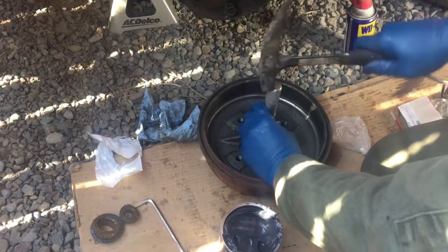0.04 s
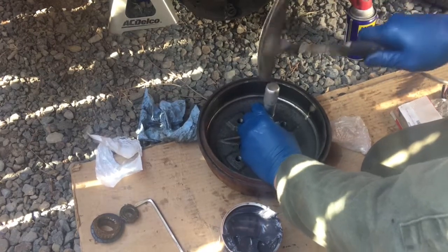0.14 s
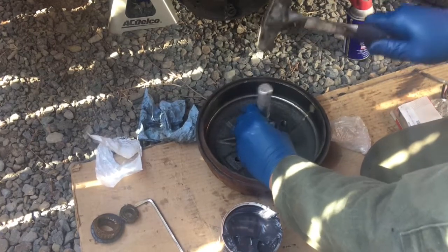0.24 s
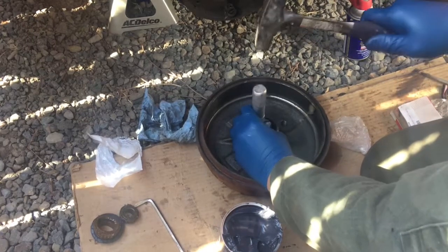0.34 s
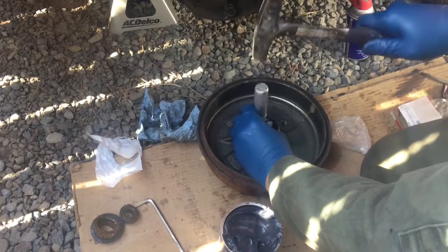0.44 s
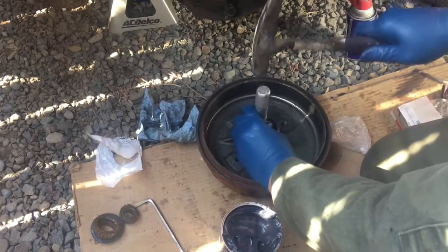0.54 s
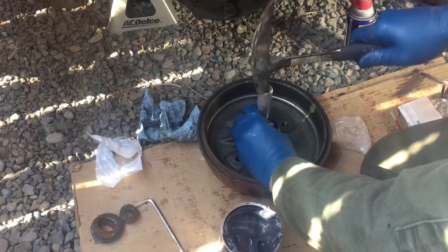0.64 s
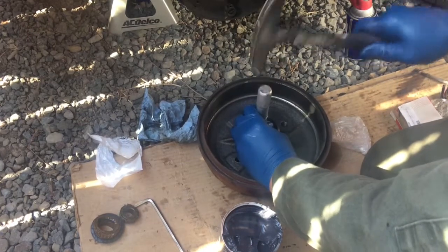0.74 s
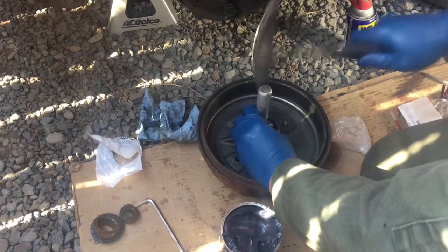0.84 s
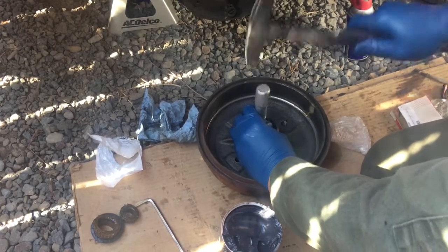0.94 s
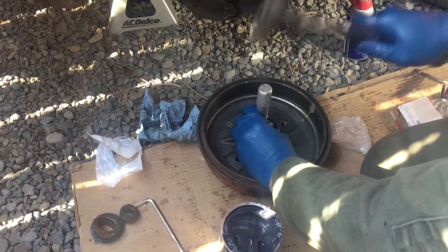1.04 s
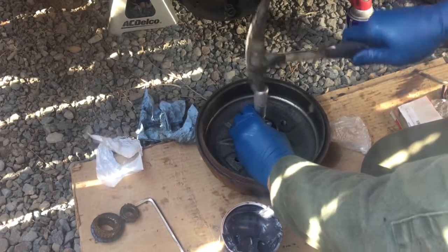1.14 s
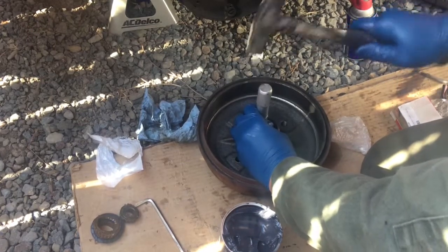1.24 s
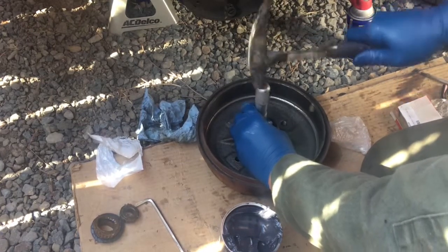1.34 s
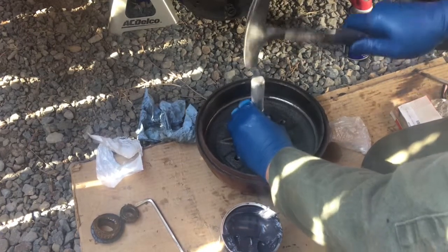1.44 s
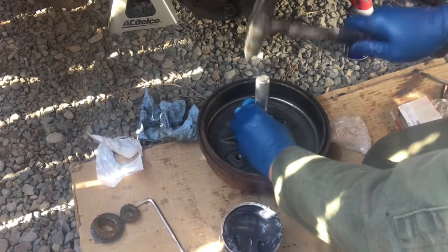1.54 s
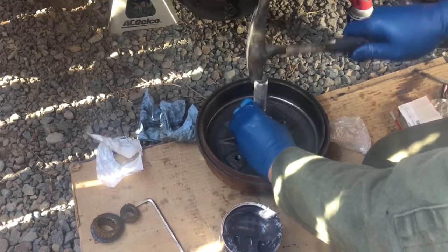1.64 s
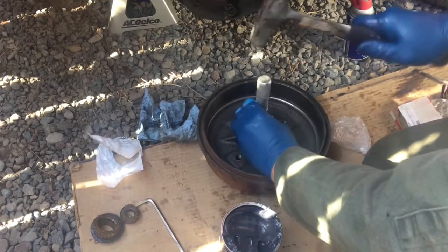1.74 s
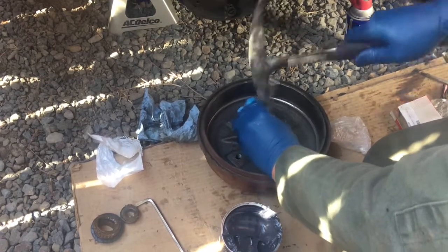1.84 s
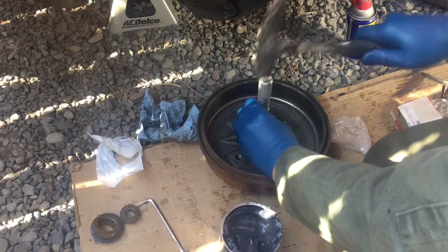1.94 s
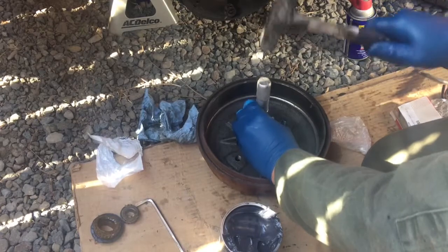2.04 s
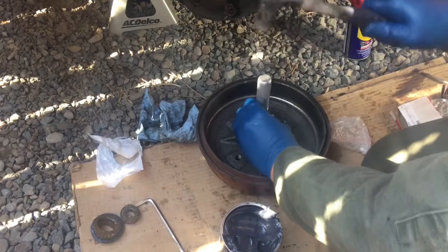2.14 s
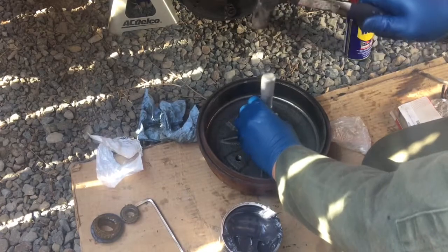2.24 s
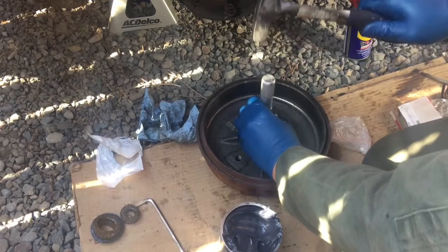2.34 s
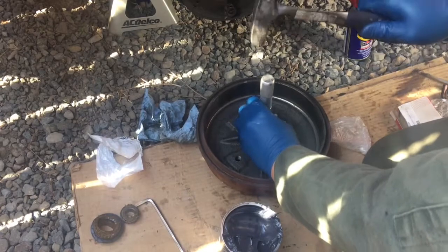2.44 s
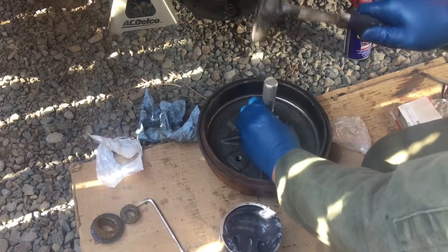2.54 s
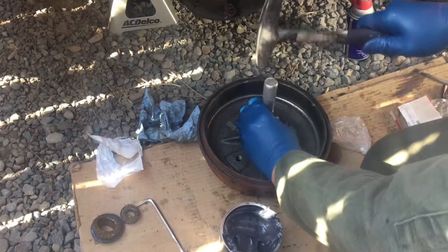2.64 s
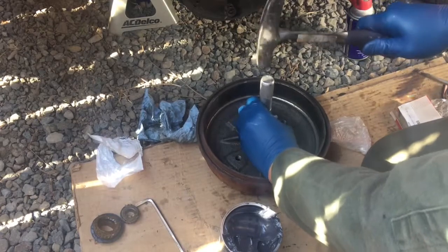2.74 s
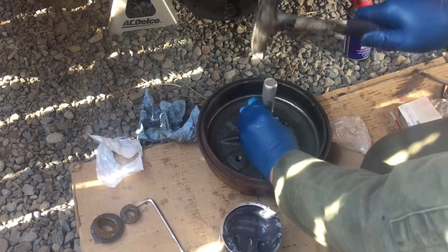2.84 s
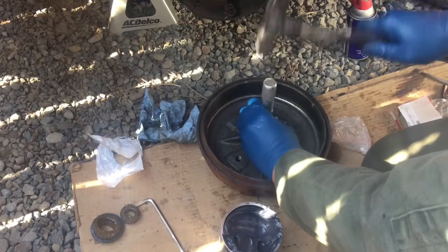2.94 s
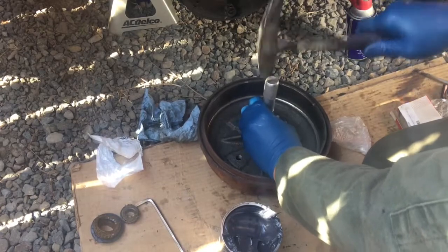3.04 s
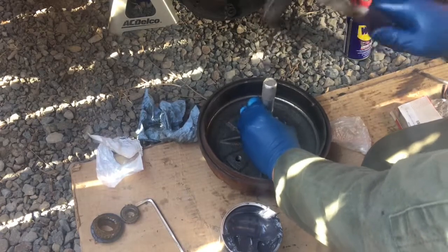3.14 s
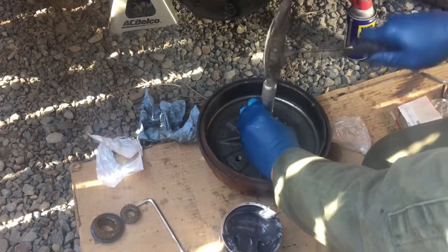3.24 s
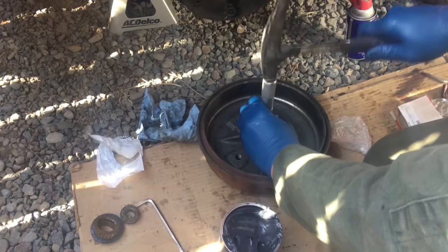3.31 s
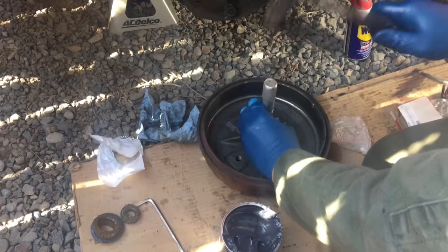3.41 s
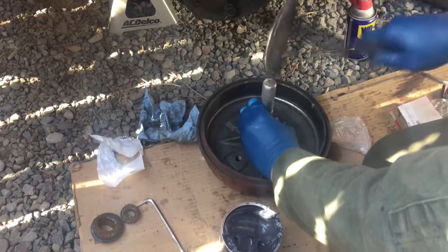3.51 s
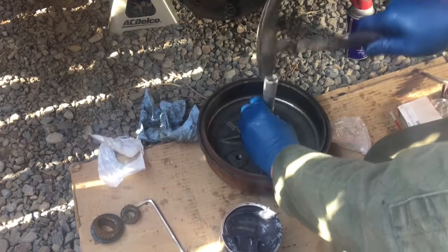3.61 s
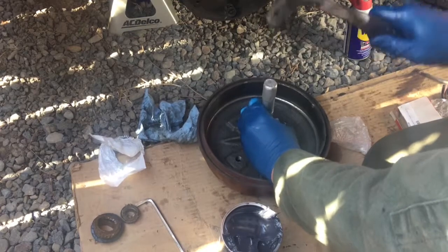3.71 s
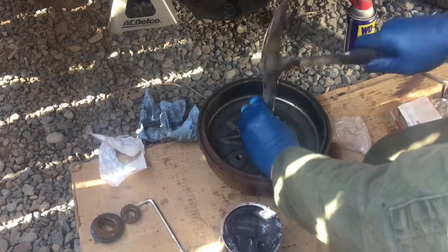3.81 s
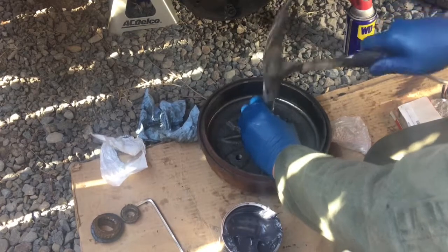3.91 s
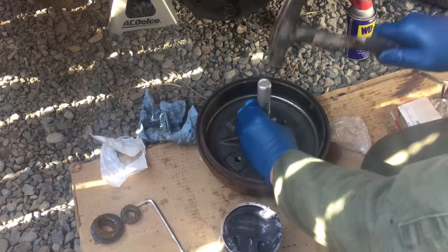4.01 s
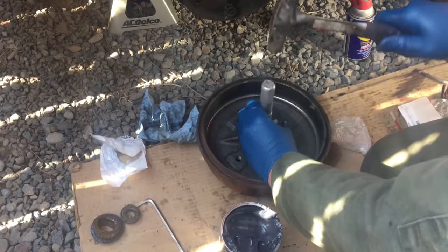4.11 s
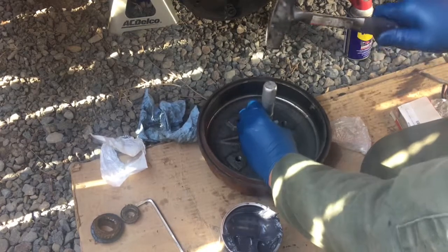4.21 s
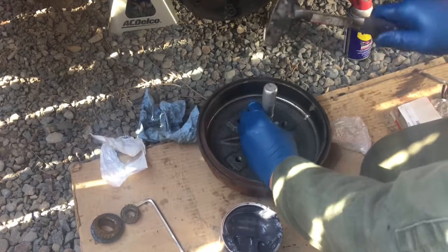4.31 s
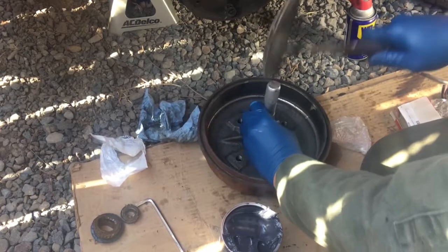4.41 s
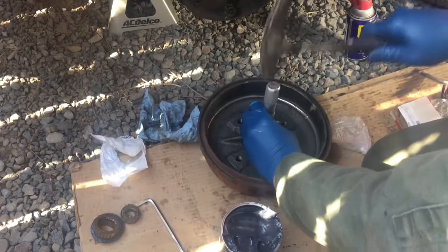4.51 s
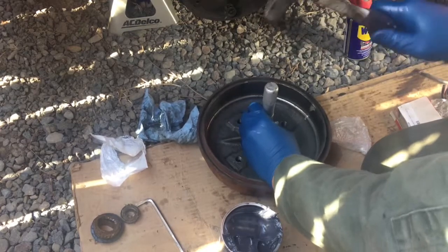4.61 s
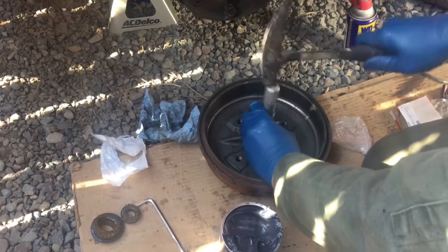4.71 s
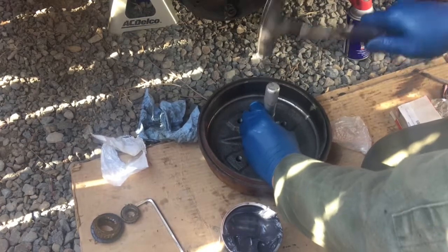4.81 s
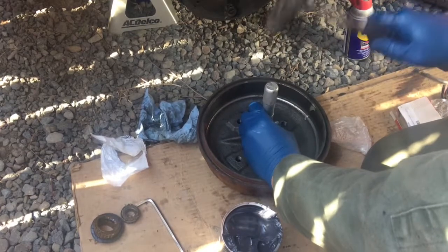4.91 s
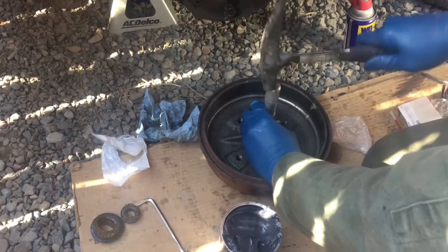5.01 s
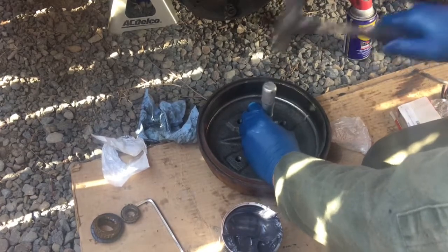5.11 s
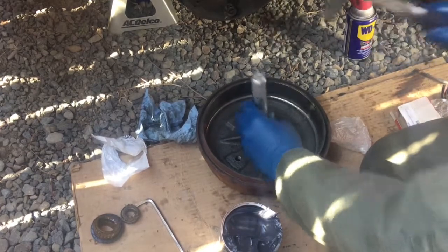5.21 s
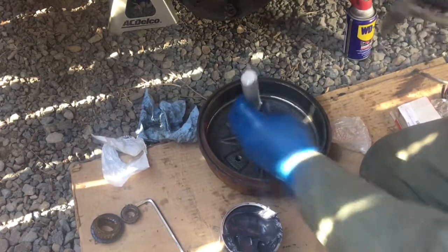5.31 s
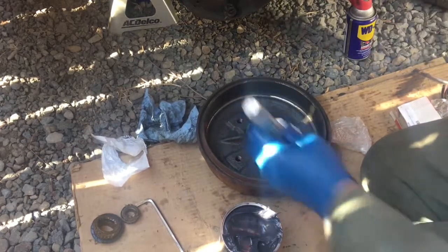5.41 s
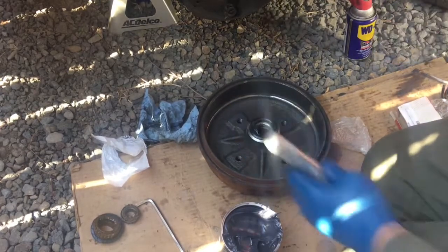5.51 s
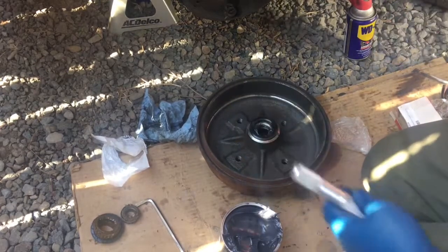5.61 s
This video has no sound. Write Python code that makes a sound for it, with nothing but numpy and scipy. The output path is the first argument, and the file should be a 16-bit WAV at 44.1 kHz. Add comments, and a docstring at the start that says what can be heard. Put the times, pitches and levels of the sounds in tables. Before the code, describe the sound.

Loud, close metal hammering outdoors: a single strike, then runs of five, four and three blows on a steel punch held against a brake drum. Each hit clanks, pings and distorts a little, leaving a soft ringing tone. A light clink and faint far-off bird chirps follow the first run. It finishes with a soft rustle of cloth and a dull knock over a faint low rumble.

```python
"""Hammering a seal in a brake drum

Outdoors, one microphone close in. A hammer drives a steel drift against the hub seal in three short
runs: each blow clanks the drum, pings the tools and overloads the microphone, and the rim hums on.
A far bird chirps in a pause; at the end a sleeve rustles as the drift is lifted, and something bumps."""
import sys
import numpy as np
from scipy import signal
from scipy.fft import rfft, irfft
from scipy.io import wavfile
from scipy.ndimage import uniform_filter1d

SR = 44100
rng = np.random.default_rng(int(sys.argv[2]) if len(sys.argv) > 2 else 0)


def wav_record(signal):
    """Record a signal, one row per channel, as 16-bit PCM in the file named by sys.argv[1]."""
    frames = np.transpose(np.atleast_2d(signal))
    bounded = np.clip(frames, -1, 1)
    # unit amplitude maps onto the largest positive 16-bit level
    quanta = np.round(bounded * 32767).astype(np.int16)
    wavfile.write(sys.argv[1], SR, quanta)


N = 249341
T, CLOCK = np.arange(SR) / SR, np.arange(N) / SR  # one second; the whole scene
HZ, ALL_HZ = np.fft.rfftfreq(SR, 1 / SR), np.fft.rfftfreq(2 * N, 1 / SR)
CONTACT_S, USUAL_CLATTER_S = .0003, .0125  # rise of a steel contact; clatter length of neutral tone

# hammer blows: t/s, force/dB, clatter length/s, spot on the seal (0-1), squareness of seating/dB,
# free ringing of the tools/dB, f/Hz favoured by the drift's tilt, its lift/dB
BLOWS = [ (-0.011, -1.5, .013, 0.7, 10, -6, 3045, 1.5), (0.8454, -3, 0.01, 0.05, -0.5, -18, 2370, 7),
         (1.0792, -3, 0.01, 0.06, 6.5, -19.5, 3080, 10.5), (1.3332, -5, .011, 0.3, -6, -19, 2230, 8),
         (1.5856, -9, .012, .05, -3, -17.5, 471, 11.5), (1.8082, -3.5, 0.0093, .25, -2.5, -15, 3760, 2.5),
         (2.9730, -3.5, 0.0084, 0.72, -7.5, -20, 1650, 4), (3.24, -3, .014, 0.87, 2, -4.5, 4220, 8.5),
         (3.5108, -6, .02, 1, 1, 5.5, 4060, 7), (3.7758, -3.5, 0.014, 1, -1, -3, 1730, 2.5),
         (4.429, -4.5, 0.0098, 0.76, -7, -13, 3840, 9.5), (4.6905, -4.5, 0.013, 0.54, 6.5, 3, 3990, -0.5),
         (4.9555, -8, 0.021, 1, 8, 3.5, 3910, -0.5)]
# chatter of drift, seal and hub: f/Hz, level/dB
CLATTER_SPECTRUM = [(40, -28), (90, -13.5), (200, -10.5), (370, -4.5), (560, -2), (900, -9), (1450, -13.5),
                    (1680, 8.5), (1900, -4), (2400, -1), (3000, -6.5), (7500, -3), (10000, -13.5),
                    (15500, -11.5)]
# modes of hub and drum, quickly damped by the ground: f/Hz, level/dB at spot 0, level/dB at spot 1
DRUM_MODES = [(247, -27, -30.5), (345, -20, -25), (385, -26.5, -7.5), (488, -10, -25.5), (572, -10, -16),
              (768, -26.5, -18.5), (1095, -34.5, -31.5), (1700, -19.5, -14.5), (1701, -14.5, -2.5),
              (1957, -27.5, -18), (2096, -16, -18), (2183, -9, -18), (2324, -12.5, -25.5), (2410, -18, -17),
              (2470, -21, -16), (3160, -15, -26.5), (3440, -28, -25.5), (3770, -21.5, -26),
              (3704, -19.5, -11.5), (4120, -25.5, -18), (4820, -26, -30)]
# modes of hammer head and drift: f/Hz; and for each: t60/s, level/dB, dB gained per dB of free ringing
TOOL_HZ = [4801, 5437, 5879, 6114, 7959, 13278]
TOOL_MODES = [(.11, -1, 1.05), (.17, -5, 1.1), (0.17, -13, 0.54), (0.13, -4, 1.2), (.072, 2.5, .45),
              (.058, 3.5, 1.4)]
# scatter off gravel and nearby walls, then the echo from further off: f/Hz, level/dB
NEAR_SPECTRUM = [(100, 3), (250, 2.5), (450, -7), (800, 0), (1100, 3), (1650, -2.5), (2200, -0.5),
                 (4000, 2), (7500, -2), (10000, 3), (15000, -2)]
FAR_SPECTRUM = [(100, -6), (450, 0.5), (1150, 3), (1700, 5.5), (2300, -1), (3200, 0.5), (4500, -4),
                (6000, -10.5), (12000, -19)]
# their decay: f/Hz, t60/s
NEAR_T60 = [(100, 0.23), (500, 0.3), (2000, 0.23), (5000, 0.18), (9000, 0.165), (15000, .16)]
FAR_T60 = [(100, 1), (1700, 1), (3200, 1), (5500, 1), (12000, .25)]
# free rim, a beating low pair and a higher tone: f/Hz; for each: t60/s, level/dB at spot 0 and at spot 1
RIM_HZ = [655, 678, 1535]
RIM_MODES = [(2.6, -48, -50.5), (3.9, -47.5, -61), (1.5, -45, -46)]
# outdoor hiss and rumble: f/Hz, level/dB
AIR_SPECTRUM = [(20, -29.5), (130, -18.5), (300, -26), (700, -32.5), (1500, -35), (3000, -41),
                (5000, -42.5), (9000, -46), (15500, -46)]
RUMBLE_SPECTRUM = [(20, -34), (32, -16), (45, -5), (62, 3.5), (90, -4), (130, -15), (250, -32.5),
                   (600, -54), (1500, -88.5)]
# slow swell of the rumble: t/s, level/dB
RUMBLE_SWELL = [(0, -52.5), (0.7, -57.5), (2.8, -57), (5, -52)]
# rebounds and light touches of the tools: t/s, level/dB, half-spread of the spectrum/octaves
TOUCHES = [(0.010, -16.5, 1.2), (0.623, -54, .62), (0.682, -52.5, 0.57), (2.2026, -25.5, 0.84),
           (3.535, -19.5, 1.4), (4.1035, -41, 2.1), (4.323, -64, 0.59), (4.984, -13, 0.84),
           (5.152, -52, 0.69), (5.534, -44, .68)]
# clink of the drift set down: f/Hz, t60/s, level/dB
CLINK_MODES = [(565, 0.103, -37.5), (1656, .055, -29), (2410, 0.053, -30.5), (3550, .045, -29.5),
               (3870, .045, -27), (6160, 0.047, -25.5), (7790, 0.044, -27)]
# far bird: t/s, length/s, start f/Hz, end f/Hz, level/dB
CHIRPS = [(2.528, 0.048, 4176, 3710, -69.5), (2.553, 0.07, 3586, 3700, -69.5),
          (2.68, 0.039, 3460, 3000, -57), (2.79, 0.041, 3390, 2320, -63)]
# rubbing cloth: f/Hz, level/dB
CLOTH_SPECTRUM = [(100, 5), (900, 3.5), (2000, 4.5), (3500, -0.5), (7000, -4.5), (11000, -11), (15500, -7)]
# something dull, bumped: f/Hz, t60/s, level/dB
BUMP_MODES = [(136, 0.075, -23.5), (304, 0.1, -27), (405, 0.099, -29), (580, 0.041, -34.5)]
# treble droop of the recorder: f/Hz, level/dB
RECORDER_RESPONSE = [(20, 0.5), (9000, -1), (12500, -3), (14500, -4), (16000, -5.5)]


def amp(db):
    """Decibels to gain."""
    return 10 ** (np.asarray(db) / 20)


def curve(points, hz):
    """Points joined by straight lines on a log-frequency axis."""
    f, value = np.transpose(points)
    return np.interp(np.log(hz + 1), np.log(f + 1), value)


def bell(hz, centre_hz, octaves):
    """A bell of height 1 on a log-frequency axis."""
    return np.exp(-.5 * (np.log2((hz + 1) / centre_hz) / octaves) ** 2)


def rise(seconds):
    """An onset that settles at 1."""
    return 1 - np.exp(-T / seconds)


def fade(t, t60):
    """Exponential decay, 60 dB down after t60."""
    return np.exp(-np.log(1000) * t / t60)


def add(mix, s, sound):
    """Mixes a sound in at time s, which may lie before zero."""
    at = round(s * SR)
    sound = sound[max(-at, 0):]
    part = mix[max(at, 0):][:len(sound)]
    part += sound[:len(part)]


def noise(shape_db):
    """Noise of rms 1 with the given spectral shape."""
    x = irfft(amp(shape_db) * np.exp(2j * np.pi * rng.random(len(shape_db))))
    return x / x.std()


def ring(modes, t=T):
    """Dying sines, one for each row of f/Hz, t60/s, level/dB."""
    return sum(amp(db) * fade(t, t60) * np.sin(2 * np.pi * (hz * t + rng.random()))
               for hz, t60, db in modes)


def clatter(length_s, colour_db, bounce_db=3, bounce_hz=220):
    """The drift chatters on the seal in uneven bounces and stops short, shaking a crowd of modes."""
    bounces = amp(bounce_db * noise(-10 * np.log10(1 + (HZ / bounce_hz) ** 6)))
    chatter = noise(curve(CLATTER_SPECTRUM, HZ) + colour_db)
    return amp(4) * chatter * bounces * np.exp(-(T / length_s) ** 1.8)


def drum(spot, colour_db, t60=.1):
    """Hub and drum ring briefly, in a mix of modes set by the spot struck."""
    modes = [(hz, t60, (1 - spot) * db0 + spot * db1 + np.interp(hz, HZ, colour_db))
             for hz, db0, db1 in DRUM_MODES]
    return amp(-1) * ring(modes) * rise(.00028)


def tool_pings(free_db):
    """The steel of hammer head and drift pings, louder when free to ring."""
    modes = [(hz, t60, db + gain * free_db) for hz, (t60, db, gain) in zip(TOOL_HZ, TOOL_MODES)]
    return amp(-1) * ring(modes) * rise(CONTACT_S)


def echo(spectrum, t60s):
    """A diffuse tail of energy 1, each band dying at its own speed."""
    hz, t, bands = signal.stft(noise(curve(spectrum, HZ)), SR, nperseg=256)
    tail = signal.istft(bands * fade(t, curve(t60s, hz)[:, None]), SR, nperseg=256)[1][:SR]
    return tail / np.linalg.norm(tail)


def surroundings(sound):
    """Gravel and nearby walls scatter a sound back; a duller, longer echo follows from further off."""
    paths = amp(-12) * echo(NEAR_SPECTRUM, NEAR_T60) + amp(-40) * echo(FAR_SPECTRUM, FAR_T60)
    return signal.fftconvolve(sound, paths * rise(.0037))[:SR]


def hammer():
    """Blows close to the microphone: a square seating knocks and thuds more, a long contact is duller."""
    out = np.zeros(N)
    for s, force_db, length_s, spot, seat_db, free_db, accent_hz, accent_db in BLOWS:
        knock = .85 * seat_db * bell(HZ, 900, octaves=.37)
        thud = .77 * seat_db * bell(HZ, 100, octaves=1)
        accent = accent_db * bell(HZ, accent_hz, octaves=.089)
        db_per_octave = .72 * np.log2(USUAL_CLATTER_S / length_s)
        colour_db = knock + thud + accent + db_per_octave * np.log2((HZ + 100) / 3000)
        clank = (drum(spot, colour_db) + clatter(length_s, colour_db)) * rise(CONTACT_S)
        pings = tool_pings(free_db)
        echoes = surroundings(clank + amp(-4) * pings)  # the tools are nearer the microphone, so drier
        add(out, s, amp(force_db) * (clank + pings + echoes))
    return out


def rim_hum():
    """The drum's free rim hums on; a longer, squarer push swings its low pair more."""
    out = np.zeros(N)
    for s, force_db, length_s, spot, seat_db, *_ in BLOWS:
        modes = [(hz, t60, (1 - spot) * db0 + spot * db1)
                 for hz, (t60, db0, db1) in zip(RIM_HZ, RIM_MODES)]
        low = length_s / USUAL_CLATTER_S * amp(.9 * seat_db) * ring(modes[:2], CLOCK)
        high = amp(-.3 * seat_db) * ring(modes[2:], CLOCK)
        out[max(round(s * SR), 0):] = 0  # each blow stops the old swing
        add(out, s, amp(force_db) * (low + high))
    return out


def outdoors():
    """The bed of the place: faint hiss over a low rumble that sinks and swells slowly."""
    air = amp(-59.5) * noise(curve(AIR_SPECTRUM, ALL_HZ))[:N]
    swell = amp(np.interp(CLOCK, *np.transpose(RUMBLE_SWELL)))
    return air + swell * noise(curve(RUMBLE_SPECTRUM, ALL_HZ))[:N]


def tick(half_spread, t60):
    """A short bright burst of contact noise."""
    return noise(30 * (bell(HZ, 3850, octaves=2 * half_spread) - 1)) * fade(T, t60)


def tool_touches():
    """Steel clicks on steel as the tools rebound and touch."""
    out = np.zeros(N)
    for s, db, half_spread in TOUCHES:
        add(out, s, amp(db) * tick(half_spread, t60=.058))
    return out


def drift_clink():
    """The drift is set down on a new spot and clinks under the hand."""
    clink = ring(CLINK_MODES) * rise(CONTACT_S)
    return clink + amp(-6) * surroundings(clink)


def bird():
    """Whistles from far off, mostly falling, smeared by their echo."""
    out = np.zeros(N)
    for s, length_s, start_hz, end_hz, db in CHIRPS:
        hz = np.geomspace(start_hz, end_hz, int(length_s * SR))
        whistle = np.sin(2 * np.pi * np.cumsum(hz) / SR)
        add(out, s, amp(db) * signal.windows.tukey(len(hz), .6) * whistle)
    tail = rng.standard_normal(SR) * fade(T, t60=.48)
    return out + amp(-3) * signal.fftconvolve(out, tail / np.linalg.norm(tail))[:N]


def sleeve(start_s=5.096, rise_s=.3, level_db=-54, grain_db=2.1):
    """Cloth brushes in a grainy rustle, louder as the arm draws back faster."""
    grains = uniform_filter1d(rng.standard_normal(N), size=200)
    arm_speed = np.clip((CLOCK - start_s) / rise_s, 0, 1)
    rubbing = noise(curve(CLOTH_SPECTRUM, ALL_HZ))[:N]
    return np.sqrt(arm_speed) * amp(level_db + grain_db * grains / grains.std()) * rubbing


def bump():
    """Something is bumped: a dull knock with a scuff."""
    return ring(BUMP_MODES) * rise(.00043) + amp(-34) * tick(half_spread=2, t60=.33)


def scene():
    """Everything at one microphone, close to the drum."""
    mix = hammer() + rim_hum() + outdoors() + tool_touches() + bird() + sleeve()
    add(mix, s=2.2026, sound=drift_clink())
    add(mix, s=5.611, sound=bump())
    return mix[None]


def record(dry, ceiling=.95, edge_hz=15800):
    """The first milliseconds of a blow overload the recorder; its treble droops, then cuts off."""
    clipped = np.clip(dry, -ceiling, ceiling)
    dulled = irfft(rfft(clipped, 2 * N) * amp(curve(RECORDER_RESPONSE, ALL_HZ)))[:, :N]
    band_limit = signal.firwin(255, edge_hz, window=("kaiser", 8), fs=SR)
    return signal.oaconvolve(dulled, band_limit[None], "same")


dry = scene()
out = record(dry)
wav_record(out)
```